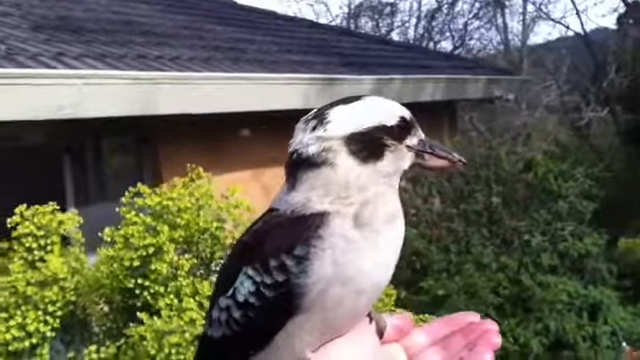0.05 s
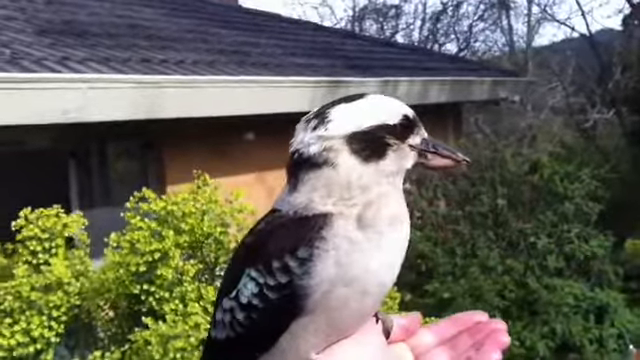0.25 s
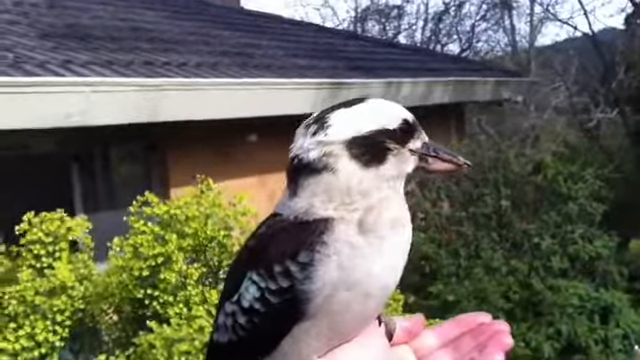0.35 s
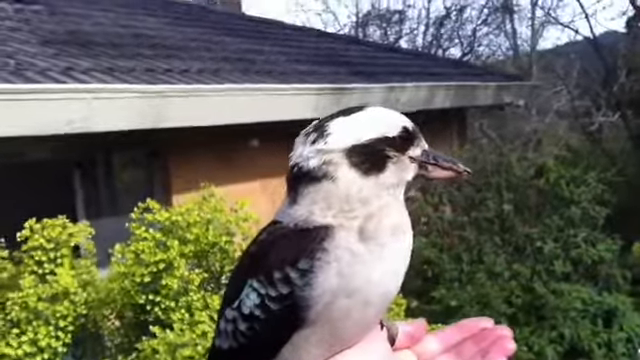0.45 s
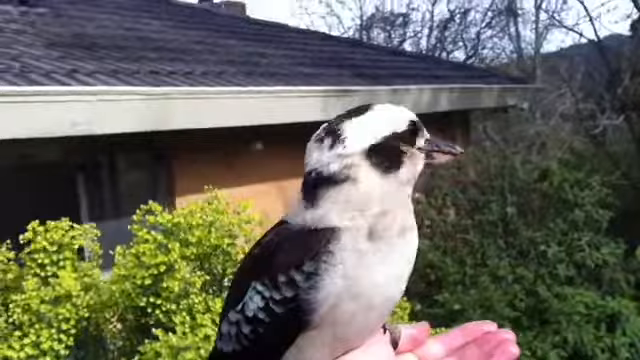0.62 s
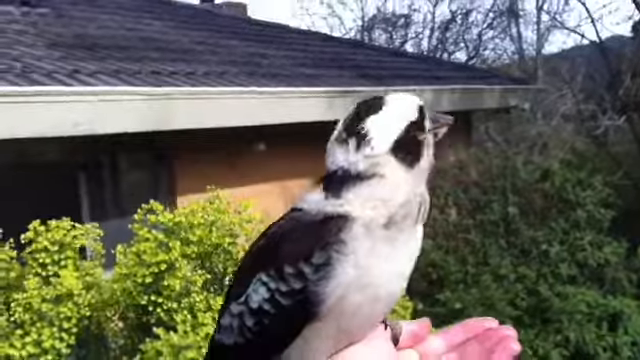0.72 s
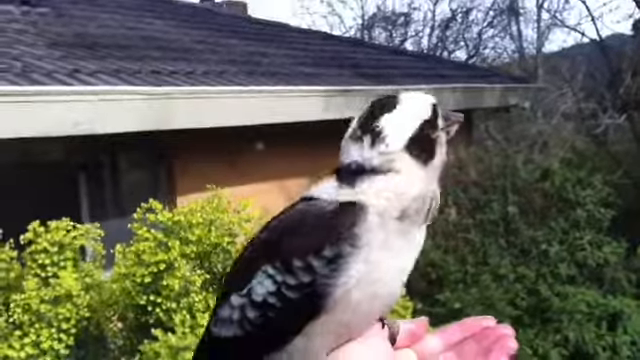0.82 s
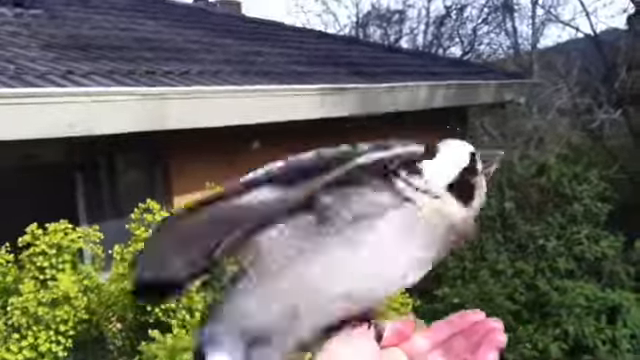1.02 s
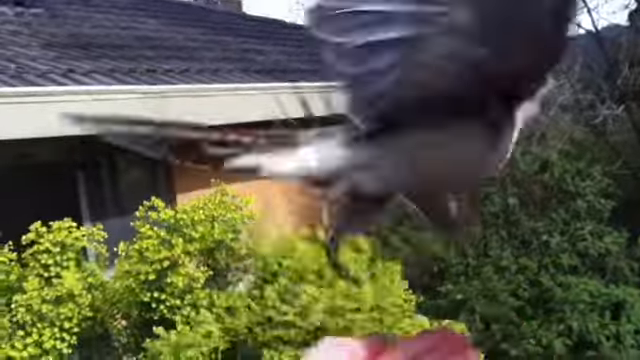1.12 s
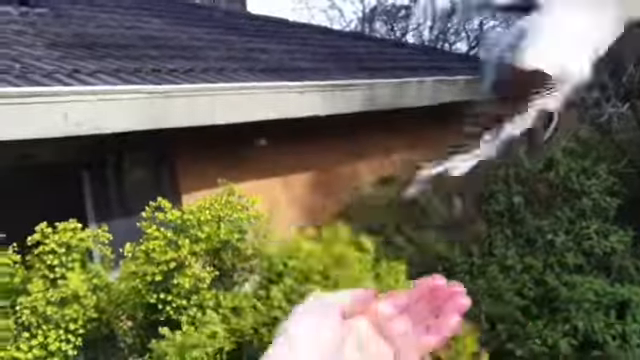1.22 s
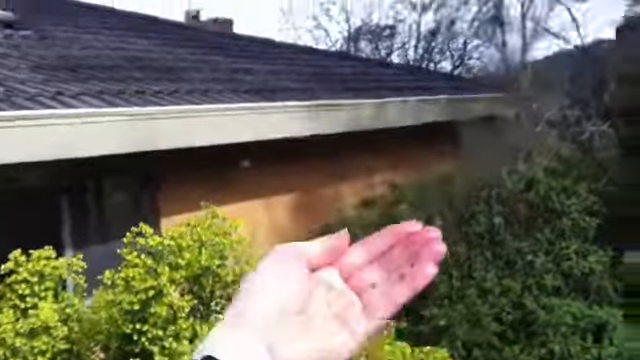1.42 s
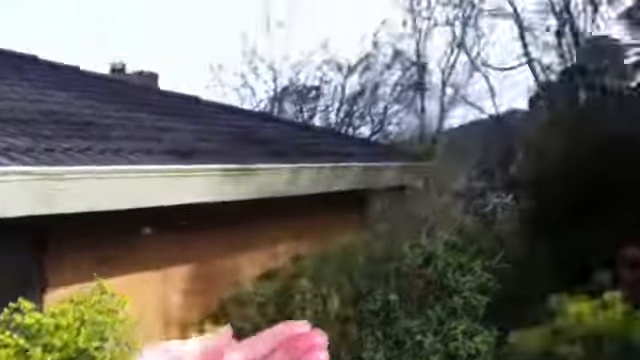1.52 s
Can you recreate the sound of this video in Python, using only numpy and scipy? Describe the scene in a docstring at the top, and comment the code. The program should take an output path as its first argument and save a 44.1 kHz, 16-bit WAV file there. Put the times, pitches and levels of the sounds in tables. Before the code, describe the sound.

A kookaburra close to the microphone gives four soft, short hooting clucks with light beak and claw ticks, then flies off with a faint flutter. Small birds whistle and trill far away in a quiet garden.

```python
"""Small birds whistle far off over a quiet garden background, echoed by house and trees.
Close by, a kookaburra on a hand gives four soft clucks: each a small throat pop, then a short,
nearly pure hoot. Its beak and claws tick lightly. It then flies off with a faint rustle and
flutter, each wing stroke pushing a puff of air, while a distant bird trills."""
import sys
import numpy as np
from scipy import signal
from scipy.fft import rfft, irfft
from scipy.io import wavfile
from scipy.ndimage import uniform_filter1d

SR = 44100
rng = np.random.default_rng(int(sys.argv[2]) if len(sys.argv) > 2 else 0)


def waveform_to_disk(signal):
    """Save audio, clipped to [-1, 1], as 16-bit WAV at the path in sys.argv[1]."""
    frames = np.transpose(np.atleast_2d(signal))
    scaled = np.clip(frames, -1, 1) * 32767
    samples = np.round(scaled).astype(np.int16)
    wavfile.write(sys.argv[1], SR, samples)


N = 68355
T = np.arange(N) / SR


def undb(db):
    """Decibels to gain."""
    return 10 ** (np.asarray(db) / 20)


def step(time_s, width_s):
    """Smooth rise from 0 to 1 around time_s = 0."""
    return .5 + .5 * np.tanh(time_s / width_s / 2)


def noise(colour):
    """Unit-RMS noise shaped by (freq_hz, gain_db) points."""
    freq_hz, gain_db = np.array(colour).T
    bins_hz = np.fft.rfftfreq(N, 1 / SR)
    gain = undb(np.interp(np.log(bins_hz + 1), np.log(freq_hz), gain_db))
    shaped = irfft(rfft(rng.standard_normal(N)) * gain, N)
    return shaped / shaped.std()


def wander(rate_hz):
    """Smooth random drift, unit spread."""
    width = max(int(SR / rate_hz), 1)
    drift = uniform_filter1d(uniform_filter1d(rng.standard_normal(N), width), width)
    return drift / drift.std()


# Background spectrum: freq_hz, gain_db
AIR_COLOUR = [(15, -61.5), (25, -28), (43, -29), (107, -5), (361, 4.5), (905, -4), (1470, -9), (2390, -10),
              (2660, -13), (3880, -15.5), (4330, -18), (7630, -19.5), (15800, -27)]

def air(level_db=-49):
    """Quiet outdoor background, slightly restless."""
    return noise(AIR_COLOUR) * undb(level_db + 1.1 * wander(10.2))


def bird_tone(pitch_hz, overtones_db, waver, flutter_db=2):
    """A small bird's wavering, fluttering tone; overtones count up from the octave."""
    phase = 2 * np.pi * np.cumsum(pitch_hz * (1 + waver * wander(348))) / SR
    overtones = sum(undb(db) * np.sin(k * phase) for k, db in enumerate(overtones_db, start=2))
    return undb(flutter_db * wander(180)) * (np.sin(phase) + overtones)


# Held whistles: start_s, length_s, pitch_hz, level_db, fourth_harmonic_db
WHISTLE_NOTES = [(-.07, 0.11, 2726, -60, -22), (0.259, 0.13, 2673, -51, -30),
                 (0.667, .14, 2647, -47.5, -18.5)]

def whistles(scoop_hz=450, scoop_s=.0043, fall_hz=45.3, swell_db=8.5):
    """Each whistle drops onto a nearly level pitch and swells."""
    out = np.zeros(N)
    for start_s, length_s, centre_hz, level_db, fourth_db in WHISTLE_NOTES:
        age_s = np.clip(T - start_s, 0, length_s)
        from_middle = age_s / length_s - .5
        gate = step(T - start_s, .003) * step(start_s + length_s - T, .0069)
        pitch_hz = centre_hz + scoop_hz * np.exp(-age_s / scoop_s) - fall_hz * from_middle
        tone = bird_tone(pitch_hz, [fourth_db - 8, fourth_db - 5, fourth_db], waver=.02)
        out += undb(level_db + swell_db * from_middle) * gate * tone
    return out


# Contour of one phrase: offset_s, pitch_hz, gain_db
PHRASE_CONTOUR = [(0, 3550, -23.5), (0.014, 3690, -10), (.045, 3980, -1.5), (.064, 4120, -17),
                  (.069, 5900, -16), (.074, 5440, -8), (0.08, 3700, 4), (0.095, 3480, -3), (.108, 2970, 3),
                  (0.127, 2666, -2), (.135, 2600, -8)]
# Sung phrases: start_s, pitch_ratio, level_db, slope_db_per_harmonic
SUNG_PHRASES = [(.047, 1.05, -53, -12), (0.451, 1.064, -49.5, -22), (.865, 1.0, -47, -10.5)]

def phrases():
    """A songbird's slurred phrase rises, then tumbles."""
    out = np.zeros(N)
    offset_s, contour_hz, contour_db = np.array(PHRASE_CONTOUR).T
    for start_s, pitch_ratio, level_db, slope_db in SUNG_PHRASES:
        age_s = T - start_s
        gate = (age_s > 0) & (age_s < offset_s[-1])
        envelope = undb(level_db + np.interp(age_s, offset_s, contour_db)) * gate
        pitch_hz = pitch_ratio * np.interp(age_s, offset_s, contour_hz)
        out += envelope * bird_tone(pitch_hz, [slope_db, 2 * slope_db], waver=.013)
    return out


# House wall reflections: delay_s, gain_db
WALL_ECHOES = [(0.025, -10), (.046, -13), (.08, -18)]

def wall_echoes(source):
    """Delayed, weaker copies returned by the house."""
    return sum(undb(db) * np.interp(T - delay_s, T, source, left=0) for delay_s, db in WALL_ECHOES)


def garden_reverb(source, wet_db, t60_s=.45):
    """Diffuse tail scattered by trees and walls."""
    tail = rng.standard_normal(N) * np.exp(-np.log(1000) * T / t60_s) * step(T - .012, .003)
    return undb(wet_db) * signal.fftconvolve(source, tail / np.linalg.norm(tail))[:N]


# Beak and claw contacts: time_s, level_db
TICK_EVENTS = [(0.2077, -52), (0.4348, -49), (0.615, -56.5), (0.6845, -47), (0.693, -49.5), (1.404, -48)]
# Tick spectrum: freq_hz, gain_db
TICK_SPECTRUM = [(2000, -27), (4000, -16.5), (5500, 4), (8000, -9.5), (12000, 0.5), (16000, -19)]

def ticks(half_width_s=.0017):
    """Tiny dry ticks of beak and claws."""
    envelope = sum(undb(db) * np.exp(-((T - time_s) / half_width_s) ** 2) for time_s, db in TICK_EVENTS)
    return envelope * noise(TICK_SPECTRUM)


# Throat openings: time_s, resonance_hz, level_db
THROAT_POPS = [(0.208, 551, -22.5), (0.216, 586, -27), (0.368, 455, -27), (0.5193, 587, -21),
               (0.6929, 591, -25.5)]

def throat_pops(rise_s=.00064, decay_s=.0017, highpass_hz=110):
    """The throat opens just before each hoot and rings for about two cycles."""
    out = np.zeros(N)
    for time_s, resonance_hz, level_db in THROAT_POPS:
        age_s = T - time_s
        rise = np.exp(-(np.minimum(age_s, 0) / rise_s) ** 2)
        decay = np.exp(-(np.maximum(age_s, 0) / decay_s) ** 2.5)
        out -= undb(level_db) * rise * decay * np.cos(2 * np.pi * resonance_hz * age_s)
    return signal.sosfilt(signal.butter(2, highpass_hz, "high", fs=SR, output="sos"), out)


# Kookaburra hoots: start_s, length_s, pitch_hz, fall_hz, level_db, overtone_lift_db
HOOTS = [(0.2308, .0338, 486.7, 31, -10, -2), (.3980, .0190, 490.6, 33.5, -13.5, -0.5),
         (0.5435, .0335, 512.8, 30.4, -10.5, 4.5), (0.7156, 0.039, 513.7, 8.4, -10, 6)]
# Overtones above the octave: harmonic, gain_db
HOOT_OVERTONES = [(3, -41), (4, -50), (5, -63), (6, -46.5), (7, -65.5), (8, -48.5)]

def hoots():
    """Hoots scoop up, then sag in pitch and strength; overtones sound while the voice is firm."""
    attack_s, release_s = .0014, .0021
    scoop_hz, scoop_s = 34.63, .00076
    sag, jitter, shimmer = .3, .0052, .013
    octave_db, octave_lag_s, rasp_db = -14.5, .00021, -36
    rasp_colour = [(30, -4), (200, -7), (600, 6), (1100, 2), (1700, -22), (5000, -36), (12000, -55)]
    out = np.zeros(N)
    for start_s, length_s, top_hz, fall_hz, level_db, lift_db in HOOTS:
        droop = np.clip((T - start_s) / length_s, 0, 1.2) ** 2
        gate = step(T - start_s, attack_s) * step(start_s + length_s - T, release_s)
        envelope = gate * (1 - sag * droop) * (1 + shimmer * wander(370))
        pitch_hz = top_hz - fall_hz * droop - scoop_hz * step(start_s - T, scoop_s)
        pitch_hz *= 1 + jitter * wander(330)
        phase = 2 * np.pi * np.cumsum(pitch_hz * (T > start_s - length_s)) / SR
        octave = undb(octave_db) * np.cos(2 * (phase - 2 * np.pi * top_hz * octave_lag_s))
        upper = sum(undb(db + lift_db) * np.cos(harmonic * phase) * (1 + .12 * wander(150))
                    for harmonic, db in HOOT_OVERTONES)
        rasp = undb(rasp_db) * noise(rasp_colour)
        out += undb(level_db) * (envelope * (np.cos(phase) + rasp) + envelope ** 1.2 * (octave + upper))
    return out


# Wing strokes: time_s, half_width_s, puff_db, rustle_db
WING_STROKES = [(1.06, 0.012, -44, -75), (1.152, 0.031, -51, -52), (1.219, 0.026, -60, -52),
                (1.278, 0.029, -57, -53), (1.407, 0.038, -52, -60.5), (1.534, 0.017, -47.5, -62)]
# Air puff, feather and downbeat spectra: freq_hz, gain_db
PUFF_SPECTRUM = [(50, -25), (130, -5.5), (280, 8), (500, 2), (1200, -11), (3000, -24)]
FEATHER_SPECTRUM = [(400, -23), (1200, 5.5), (2500, 3), (5000, -4), (9000, -3), (14000, -4), (16000, -4)]
DOWNBEAT_SPECTRUM = [(70, -28), (170, -1), (300, 0.5), (380, -12), (600, -28), (2000, -34)]

def take_off(downbeat_s=1.28, downbeat_half_width_s=.015, downbeat_db=-42):
    """Each stroke pushes a puff of air and rubs the feathers; one downbeat thumps softly."""
    puff = noise(PUFF_SPECTRUM)
    rustle = noise(FEATHER_SPECTRUM) * undb(1.6 * wander(430))
    strokes = np.zeros(N)
    for time_s, half_width_s, puff_db, rustle_db in WING_STROKES:
        envelope = np.exp(-((T - time_s) / half_width_s) ** 2)
        strokes += envelope * (undb(puff_db) * puff + undb(rustle_db) * rustle)
    thump = np.exp(-((T - downbeat_s) / downbeat_half_width_s) ** 2) * noise(DOWNBEAT_SPECTRUM)
    return strokes + undb(downbeat_db) * thump


# Trill notes: start_s, length_s, onset_pitch_hz, level_db
TRILL_NOTES = [(1.108, 0.022, 2680, -47), (1.137, 0.023, 2663, -47), (1.164, 0.026, 2700, -44),
               (1.191, 0.0257, 2754, -48.5), (1.222, 0.024, 2800, -57.5)]

def trill(fall_hz=276):
    """A small bird's quick run of falling notes."""
    out = np.zeros(N)
    for start_s, length_s, onset_hz, level_db in TRILL_NOTES:
        gate = step(T - start_s, .002) * step(start_s + length_s - T, .0015)
        pitch_hz = onset_hz - fall_hz * np.clip((T - start_s) / length_s, 0, 1)
        out += undb(level_db) * gate * bird_tone(pitch_hz, [], waver=.0153)
    return out


def scene():
    """Echoing far birds behind a close, nearly dry kookaburra; mono."""
    songs = whistles() + phrases() + trill()
    far_birds = songs + wall_echoes(songs) + garden_reverb(songs, wet_db=-4)
    clucks = throat_pops() + hoots()
    kookaburra = ticks() + clucks + garden_reverb(clucks, wet_db=-38) + take_off()
    return (air() + far_birds + kookaburra)[None]


def record(dry, cutoff_hz=15900):
    """A steep low-pass cuts the top treble."""
    return signal.sosfilt(signal.ellip(10, .2, 80, cutoff_hz, fs=SR, output="sos"), dry)


dry = scene()
out = record(dry)
waveform_to_disk(out)
```